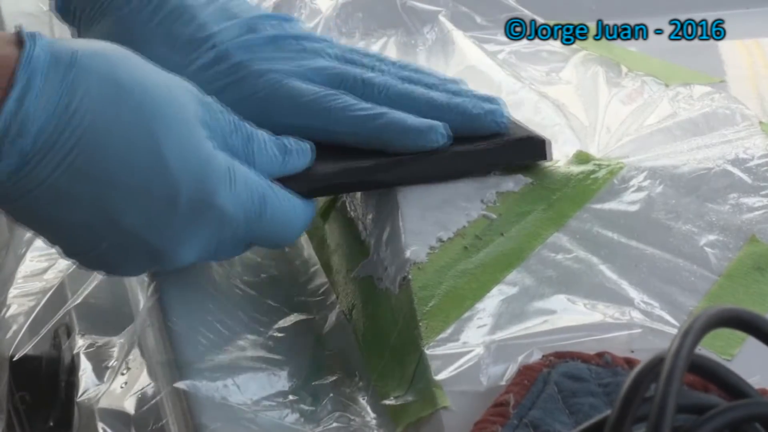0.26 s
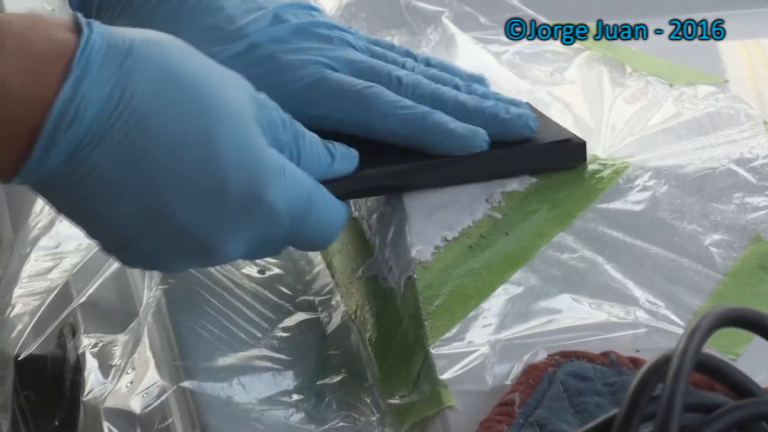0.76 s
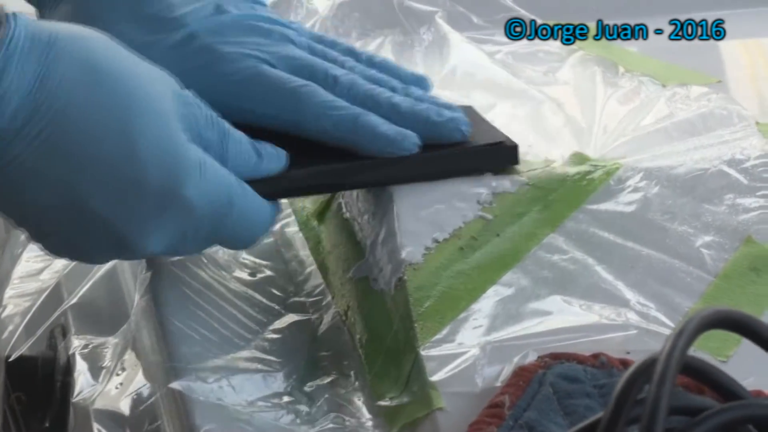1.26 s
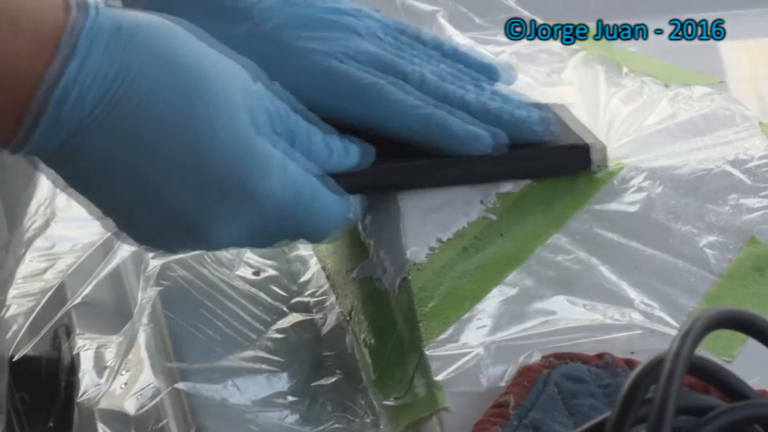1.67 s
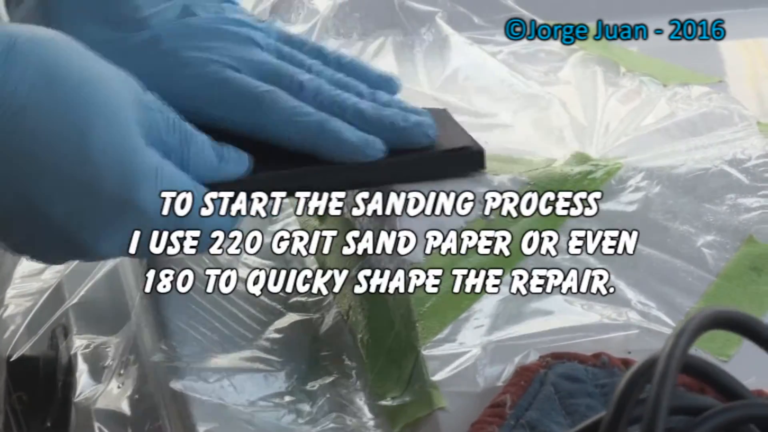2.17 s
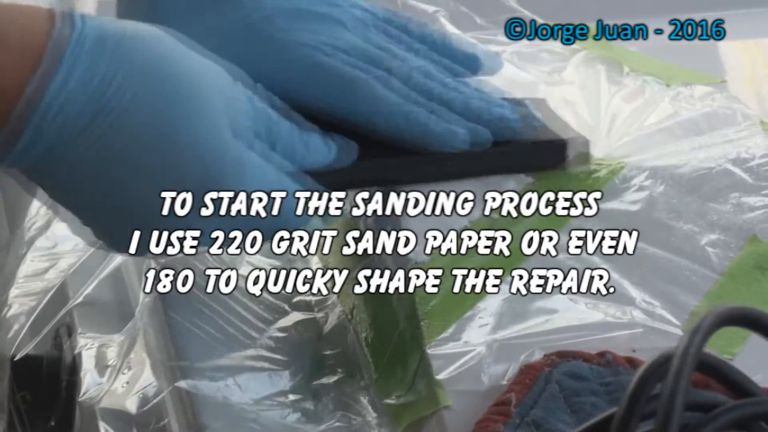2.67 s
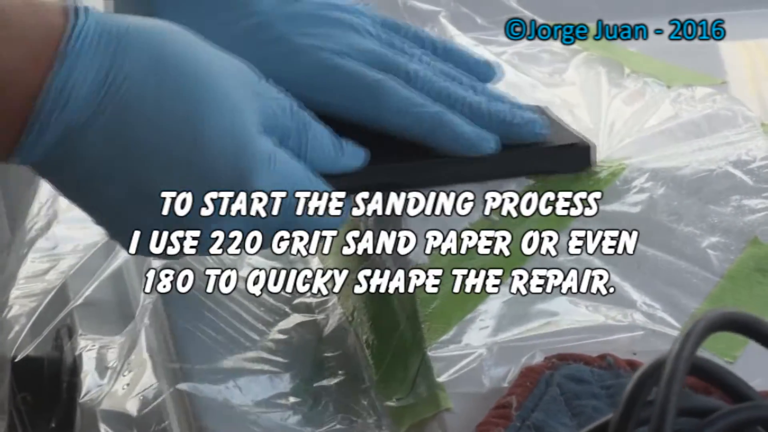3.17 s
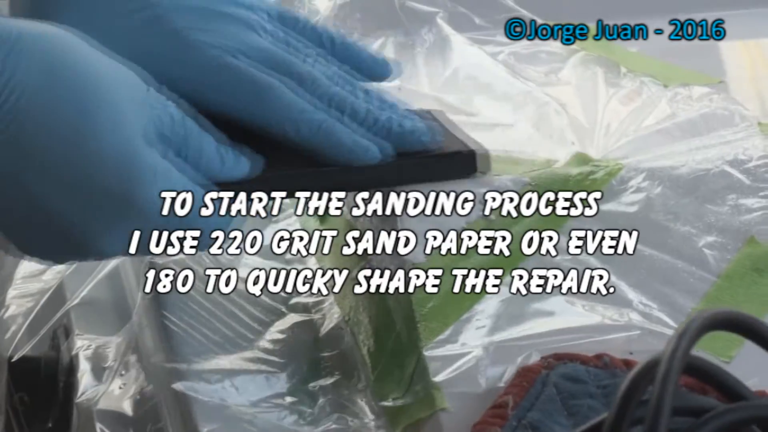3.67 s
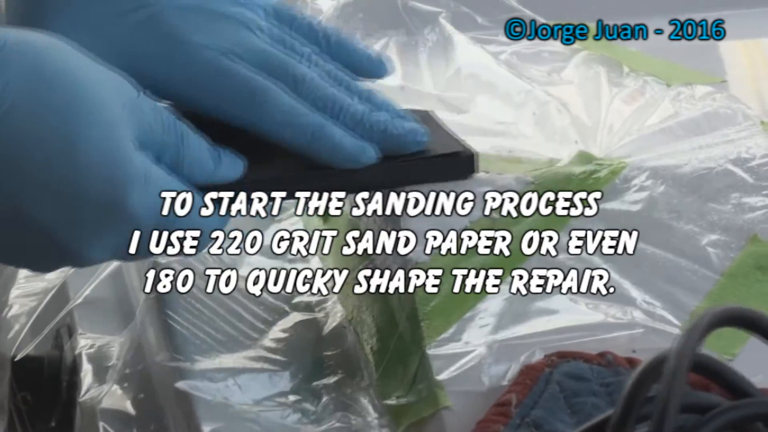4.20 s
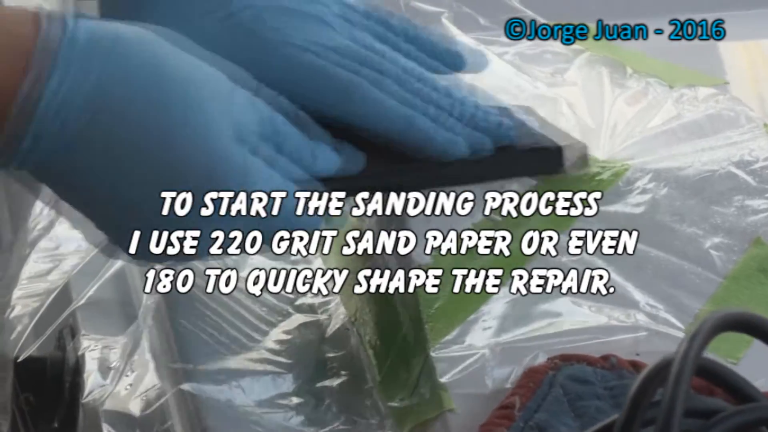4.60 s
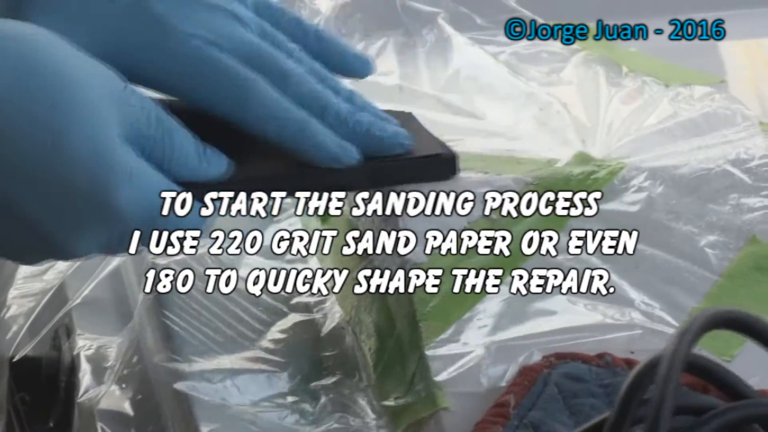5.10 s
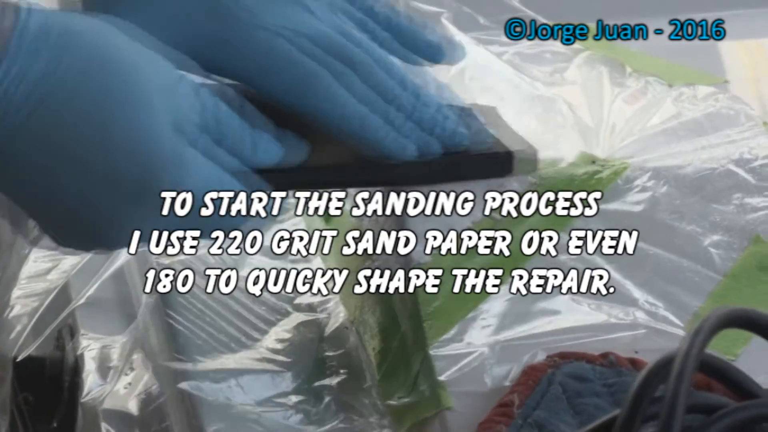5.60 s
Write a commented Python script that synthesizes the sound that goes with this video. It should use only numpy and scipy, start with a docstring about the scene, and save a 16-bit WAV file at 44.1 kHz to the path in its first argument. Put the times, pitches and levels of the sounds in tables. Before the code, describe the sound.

Fine sandpaper on a hand block rasps quickly to and fro over a hard hull, close up, while a vehicle passes nearby and fades into distant traffic.

```python
"""Beside a street, a hand block with fine sandpaper is pushed quickly to and fro over a coated fibreglass hull.
Close up, grit rasps in every stroke as bursts of tiny random fractures and rings the block's resonances.
Coarse grains snap now and then as struck resonances; a panel booms dully once.
At first a motor vehicle passes nearby, as filtered noise and sines tied to its crank rate;
then its drone sinks in pitch and fades into distant traffic."""
import sys
import numpy as np
from scipy import signal
from scipy.fft import rfft, irfft, next_fast_len
from scipy.io import wavfile

SR = 44100
rng = np.random.default_rng(int(sys.argv[2]) if len(sys.argv) > 2 else 0)


def store_pcm(level_fs):
    """Save levels as 16-bit WAV."""
    pcm = np.round(np.clip(level_fs, -1, 1) * 32767).astype(np.int16)
    wavfile.write(sys.argv[1], SR, np.atleast_2d(pcm).T)


N = 257984
TIME = np.arange(N) / SR
SIZE = next_fast_len(N + 4096)
FREQS = np.maximum(np.arange(SIZE // 2 + 1) * SR / SIZE, 1)

NEAREST_S = 0.45  # the vehicle is nearest
# lead of the left port for street sounds: frequency_hz, left_lead_rad
STREET_LEAD = [(40, 1), (130, 1), (500, 0.78), (1200, 0.44), (3000, .1)]


def from_db(db):
    """Decibels to gain."""
    return 10 ** (np.asarray(db) / 20)


def rms_one(x):
    """Scale to unit power."""
    return x / np.sqrt(np.mean(x ** 2) + 1e-20)


def in_time(rows):
    """One curve over time for each column after the first."""
    s, *columns = np.transpose(rows)
    return [np.interp(TIME, s, c) for c in columns]


def over_hz(points):
    """Join points on a log-frequency axis."""
    hz, value = np.transpose(points)
    return np.interp(np.log(FREQS), np.log(hz), value)


def filtered(x, response):
    """Pass a signal through a frequency response."""
    return irfft(rfft(x, SIZE) * response, SIZE)[..., :N]


def resonances(modes):
    """Response of damped modes in parallel."""
    response = 0
    for hz, width, db in modes:
        response = response + from_db(db) / (1 + 1j * (FREQS ** 2 - hz ** 2) / (FREQS * width))
    return response


def drift(rate_hz):
    """Slow random wander with spread 1, made at every 64th sample."""
    count = 4096
    hz = np.arange(count // 2 + 1) * SR / (64 * count)
    slow = irfft(rfft(rng.standard_normal(count)) / (1 + (hz / rate_hz) ** 2))
    return np.interp(np.arange(N) / 64, np.arange(count), rms_one(slow))


def ports(pair, colour, balance, likeness, phase):
    """Colour two unrelated signals and mix them into a partly alike left and right; rms 1."""
    alike = np.clip(over_hz(likeness), 0, .999)
    mid, side = rfft(pair, SIZE)
    sign = np.array([[1], [-1]])
    gains = from_db(sign * over_hz(balance) / 2)
    gains = gains / np.sqrt(np.mean(gains ** 2, axis=0))
    gains = gains * np.exp(.5j * sign * over_hz(phase))
    both = np.sqrt(1 + alike) * mid + sign * np.sqrt(1 - alike) * side
    return rms_one(irfft(both * gains * colour, SIZE)[:, :N])


def pass_by():
    """Relative dB as the vehicle goes by: distance alone, then the engine bay with load and shadow."""
    pass_s, falloff = 0.52, 1.307  # time scale of the pass; amplitude fades as this power of distance
    away_s, away_over_s, shadow_db = 1.21, 0.032, -9  # its front faces away, which shades the engine bay
    ease_s, ease_over_s, load_db = 0.24, .04, 7  # the engine eases off; until then it is rougher
    distance_db = -10 * falloff * np.log10(1 + ((TIME - NEAREST_S) / pass_s) ** 2)
    away = .5 + .5 * np.tanh((TIME - away_s) / away_over_s)
    load = .5 - .5 * np.tanh((TIME - ease_s) / ease_over_s)
    return distance_db, distance_db + shadow_db * away + load_db * load


def street_noise(spectrum, ring_db=0):
    """Steady noise from the street, coloured by narrow resonances of the surroundings."""
    # narrow bands that stand out: frequency_hz, width_hz, level_db
    street_modes = [(264, 14, -9), (500, 46, -3), (575, 17, -14), (700, 26, -3), (830, 92, 2),
                    (960, 123, -1), (1200, 38, -6.5)]
    # level of left over right: frequency_hz, left_right_db
    street_balance = [(30, -9), (70, -5), (130, -3), (500, -3.5), (1000, -4.5), (3000, -5.5), (12000, -5)]
    # how alike the two ports sound: frequency_hz, likeness (0-1)
    street_likeness = [(30, 0.4), (120, 0.59), (300, 1), (600, 1), (1200, 0.69), (3000, 0.38), (10000, 0.2)]
    ring = np.abs(1 + from_db(ring_db) * resonances(street_modes))
    colour = from_db(over_hz(spectrum)) * ring
    return ports(rng.standard_normal((2, SIZE)), colour, street_balance, street_likeness, STREET_LEAD)


def street(roar_db=-30.0, flutter_db=1.2, rumble_db=-36, rumble_fall_db_per_s=5, far_rumble_db=-53,
           traffic_db=-42.5):
    """Tyre roar and a quickly sinking rumble of the passing vehicle over far traffic."""
    # noise spectra of tyres and body, of the low rumble, and of far traffic: frequency_hz, density_db
    roar_spectrum = [(100, 1.5), (250, -2), (350, 0.5), (420, 2), (530, 3.5), (680, 1.5), (850, -2.5),
                     (1300, -5.5), (2000, -10.5), (3200, -21.5), (6000, -52), (15000, -60)]
    rumble_spectrum = [(20, -54), (50, -37), (80, -42), (130, 12), (200, 4), (300, 1.5), (500, -25),
                       (1500, -56)]
    traffic_spectrum = [(20, -21.5), (45, 4), (70, 2), (115, 0.5), (180, -2.5), (340, -8.5), (520, -9.5),
                        (900, -10.5), (1400, -8), (2500, -15.5), (6000, -19), (15000, -31)]
    distance_db, bay_db = pass_by()
    roar_gain = from_db(roar_db + distance_db + flutter_db * drift(1.7))
    near_rumble = from_db(rumble_db + bay_db - rumble_fall_db_per_s * TIME)
    rumble_gain = np.hypot(near_rumble, from_db(far_rumble_db))
    roar = roar_gain * street_noise(roar_spectrum)
    rumble = rumble_gain * street_noise(rumble_spectrum)
    traffic = from_db(traffic_db) * street_noise(traffic_spectrum)
    return roar + rumble + traffic


def engine(note_db=4.0, uneven_db=-31, whine_db=-42, waver_db=2.5, wander_rad=0.44, far_waver_db=3.0,
           far_wander_rad=0.74, far_loss_db=-3, whine_wander_rad=0.61, level_db=-3.0, pan_db=-3.2):
    """Orders of the crank rate: exhaust note, firing hum, wavering lines between and a whine; a throb below."""
    # engine speed: time_s, crank_turns_per_s
    crank_rate = [(0, 16.8), (1.2, 16.6), (2.3, 16.2), (3.6, 15.95), (5.85, 15.2)]
    # exhaust note, eight times the crank rate: time_s, relative_db
    note = [(0.0, -22.5), (0.16, -22), (0.31, -34), (0.45, -37), (0.5, -20), (0.55, -26), (0.63, -19),
            (1.12, -29), (1.29, -51), (1.38, -41), (1.79, -36), (2.38, -54), (2.54, -44), (3.36, -43.5),
            (4.32, -55.5), (4.43, -41.5), (4.56, -47), (5.85, -39.5)]
    # firing hum, six times the crank rate: time_s, relative_db
    hum = [(0, -36), (1.2, -53), (1.5, -41), (2.3, -37.5), (2.5, -45), (5.85, -56.5)]
    # lines of the uneven firing: crank_multiple, relative_db
    uneven_lines = [(4, -19), (5, -2), (7.5, -11), (10, -18), (11, -3), (13, -7.5), (14, -11.5), (15, -13),
                    (16, -8.5), (19, -11.5), (22, -13)]
    # very deep throb: time_s, pitch_hz, relative_db
    throb = [(0.9, 38, -64), (2, 34, -47), (2.9, 29.3, -44), (3.3, 27.3, -50), (3.7, 26, -70)]
    crank = 2 * np.pi * np.cumsum(in_time(crank_rate)[0]) / SR
    _, bay_db = pass_by()
    far = TIME / TIME[-1]  # the farther the vehicle, the more its tones fade in and out on the way
    tone = np.zeros(N)

    exhaust_db = note_db + in_time(note)[0] + far * far_loss_db
    for order, db in ((8, exhaust_db), (6, in_time(hum)[0])):
        gain = from_db(db + far * far_waver_db * drift(9))
        tone += gain * np.sin(order * crank + far * far_wander_rad * drift(12))

    for order, db in uneven_lines:
        phase = order * crank + rng.uniform(0, 2 * np.pi) + wander_rad * drift(17.0)
        tone += from_db(uneven_db + bay_db + db + waver_db * drift(6.8)) * np.sin(phase)

    # the whine beams sideways and flares as the vehicle is nearest
    beam_db, beam_s = 9, 0.23
    flare_db = beam_db * np.exp(-((TIME - NEAREST_S) / beam_s) ** 2)
    whine_phase = 29 * crank + whine_wander_rad * drift(4.6)
    tone += from_db(whine_db + bay_db + flare_db) * np.sin(whine_phase)

    throb_hz, throb_db = in_time(throb)
    tone += from_db(throb_db) * np.sin(2 * np.pi * np.cumsum(throb_hz) / SR)

    half = np.array([[.5], [-.5]])  # left and right share the difference
    direction = from_db(half * pan_db) * np.exp(1j * half * over_hz(STREET_LEAD))
    return np.sqrt(2) * from_db(level_db) * filtered(tone, direction)


def arm_motion(rasp_power, creep):
    """The block speeds up and stops in each stroke; gives speed and the strengths of hiss, rasp and fizz."""
    # strokes, push and pull in turn: top_speed_s, relative_db, bite_db (lower rasp against the stroke)
    strokes = [(0.095, -48, -1), (0.29, -54, -5), (0.446, -35, -1.5), (0.687, -32.5, -8.5),
               (0.84, -34.5, -2.5), (0.985, -38, -5.5), (1.166, -32.5, -2), (1.314, -31, -6.5),
               (1.474, -32.5, -2), (1.638, -29.5, -9.5), (1.78, -29.5, -4.5), (1.927, -29, -6),
               (2.09, -30.5, -4), (2.236, -30, -7), (2.397, -27, -5.5), (2.525, -27.5, -9),
               (2.687, -27.5, -8), (2.826, -31, -8), (2.98, -30.5, -2), (3.114, -33, -6.5),
               (3.262, -30, -6), (3.413, -28.5, -5.5), (3.566, -27.5, -6), (3.71, -29, -8),
               (3.85, -30, -5.5), (4.008, -31, -6), (4.137, -28, -4.5), (4.289, -31.5, -7),
               (4.44, -27.5, -5), (4.573, -29, -7.5), (4.722, -28.5, -5.5), (4.878, -31, -6),
               (5.032, -28, -5.5), (5.167, -27.5, -7.5), (5.311, -27, -7), (5.461, -28.5, -5.5),
               (5.603, -28.5, -4.5), (5.747, -29.5, -7), (5.895, -27.5, -4)]
    # top fizz against the hiss: time_s, relative_db
    fizz_curve = [(0, -2.5), (2.3, 0), (3.3, -2), (4.5, -1), (5.05, -0.5), (5.6, -6), (5.85, -3)]
    # the block turns this far between two top speeds, or rests if they lie far apart
    turn_share, longest_half_s = 0.43, 0.073
    push_steep, pull_steep = 1.09, 0.96  # how steeply the sound swells with speed
    hesitant_steep, settled_s = 0.33, 1.3  # added at first, until the rhythm has settled
    speed, hiss, rasp, fizz = np.zeros((4, N))
    gaps = np.diff([row[0] for row in strokes])
    run_ups = np.minimum((1 - turn_share) * np.r_[np.inf, gaps], longest_half_s)
    run_outs = np.minimum(turn_share * np.r_[gaps, np.inf], longest_half_s)
    for k, (s, level_db, bite_db) in enumerate(strokes):
        steep = pull_steep if k % 2 else push_steep
        steep += hesitant_steep * max(1 - (s / settled_s) ** 2, 0)
        travel = np.interp(TIME, [s - run_ups[k], s, s + run_outs[k]], [0, .5, 1])
        swell = np.abs(np.sin(np.pi * travel)) ** steep
        speed += swell
        hiss += from_db(level_db) * swell
        rasp += from_db(level_db + bite_db) * swell ** rasp_power
        fizz += from_db(level_db) * swell ** 1.01  # the top needs speed
    fizz *= from_db(in_time(fizz_curve)[0])
    # once the rhythm is under way the paper never quite rests at a turn
    under_way = np.interp(TIME, [1.05, 1.6], [.15, 1])
    resting = creep * from_db(in_time(strokes)[0]) * under_way
    # the top fizz and the rasp die down further than the hiss
    return speed, np.hypot(hiss, resting), np.hypot(rasp, resting / 2), np.hypot(fizz, 0.66 * resting)


def grit(speed, per_s, spread_db):
    """Tiny fractures of uneven size, more of them at speed; even in power."""
    chance = np.clip(per_s * (speed + .25) / SR, .001, 1)
    sizes = from_db(spread_db * np.minimum(rng.exponential(1, (2, N)), 5))
    breaks = rng.random((2, N)) < chance
    return breaks * sizes * rng.standard_normal((2, N)) / np.sqrt(chance)


def at_block(pair, colour):
    """A sound from the sanding block as the two microphone ports hear it."""
    # level of left over right: frequency_hz, left_right_db
    block_balance = [(400, -28), (1400, -9), (2400, -4.5), (3600, -6), (4800, -7.5), (7000, -7), (8500, -3),
                     (9600, -1.5), (11100, 3), (11700, -10), (13400, -14), (14200, -18)]
    # how alike the two ports sound: frequency_hz, likeness (0-1)
    block_likeness = [(400, 0.47), (2000, 0.87), (6000, 0.76), (10500, 0.76), (13400, 0.93), (15000, .15)]
    # lead of the left port: frequency_hz, left_lead_rad
    block_lead = [(1000, -0.22), (2000, -0.26), (3800, 0.64), (5700, 0.057), (7400, -0.98), (11100, 0.012),
                  (11800, 0.11)]
    return ports(pair, colour, block_balance, block_likeness, block_lead)


def sanding(hiss_db=-5.5, fizz_db=-6.5, rasp_db=-4.5, ring_db=-8.0, creep=0.2, judder_db=0.56,
            rasp_judder_db=1.0, rasp_power=0.66, split_hz=7500):
    """Grit hisses with speed; a stroke that bites harder also rasps lower and rings the block."""
    # fine hiss and lower rasp of the grit: frequency_hz, density_db
    hiss_spectrum = [(300, -16), (1200, -7), (2200, -11), (3300, -4), (4600, -1), (6500, -0.5),
                     (8000, -0.5), (10500, 1), (11500, 0), (12700, -3.5), (14000, -8), (15800, -14.5)]
    rasp_spectrum = [(150, -3), (250, -3.5), (350, -21), (490, -1.5), (700, -6.5), (1200, -12.5), (1700, 1),
                     (2100, -3.5), (2700, 1.5), (3600, -1), (5000, -11), (9000, -14)]
    # resonances of block and hull: frequency_hz, width_hz, level_db
    block_modes = [(1747, 160, -3.5), (1938, 60, 1.5), (2240, 70, -0.5), (2443, 53, 1), (2515, 160, 1.5),
                   (2877, 160, -7), (3050, 43, -3.5), (3770, 200, -4), (5510, 130, -12), (6930, 133.5, -4)]
    speed, hiss_gain, rasp_gain, fizz_gain = arm_motion(rasp_power, creep)
    low_share = 1 / (1 + (FREQS / split_hz) ** 6)  # power share of hiss below the fizz
    colour = from_db(over_hz(hiss_spectrum))
    hiss_grit = grit(speed, per_s=22000, spread_db=2.0)
    fizz_grit = grit(speed, per_s=20000, spread_db=2.0)
    rasp_grit = grit(speed, per_s=16000, spread_db=1.5)
    ring_grit = grit(speed, per_s=10000, spread_db=1.2)
    hiss = from_db(hiss_db) * at_block(hiss_grit, colour * np.sqrt(low_share))
    fizz = from_db(fizz_db) * at_block(fizz_grit, colour * np.sqrt(1 - low_share))
    rasp = from_db(rasp_db) * at_block(rasp_grit, from_db(over_hz(rasp_spectrum)))
    ring = from_db(ring_db) * at_block(ring_grit, resonances(block_modes))
    # the grip of the paper wavers along the way
    grip = from_db(judder_db * drift(42))
    rasp_grip = from_db(rasp_judder_db * drift(30))
    return grip * (hiss_gain * hiss + fizz_gain * fizz + rasp_gain * (rasp + ring) * rasp_grip)


def snaps(pan_db=-2.5, crumble=0.024, crumble_s=0.011):
    """A coarse grain breaks with one click and crumbles for a few milliseconds, exciting damped modes."""
    # coarse grains that catch and snap: start_s, relative_db, top_edge_hz
    snap_list = [(0.041, -34, 7000), (0.2015, -30, 12000), (0.207, -37, 10000), (0.311, -33, 12500),
                 (0.318, -31, 12500), (0.393, -26, 13000), (0.693, -15.5, 14000), (1.557, -13, 11000),
                 (1.564, -17, 8000), (1.759, -19.5, 3500), (1.802, -16.5, 12500), (1.905, -17, 12500),
                 (2.9515, -19, 9000), (4.273, -17.5, 12500)]
    # what a snap rings with: frequency_hz, width_hz, level_db
    snap_modes = [(2390, 570, -2), (5130, 1100, -1.5), (6660, 980, -3.5), (10400, 3200, -6)]
    out = np.zeros(N)
    age = TIME[:SR // 20]
    impulse = irfft(resonances(snap_modes))[:len(age)]
    for s, level_db, edge_hz in snap_list:
        burst = (age == 0) + crumble * rng.standard_normal(len(age)) * np.exp(-age / crumble_s)
        lowpass = signal.butter(4, edge_hz, fs=SR, output="sos")
        ring = signal.sosfilt(lowpass, impulse)
        snap = signal.fftconvolve(burst, ring / np.abs(ring).max())[:len(age)]
        at = round(s * SR)
        out[at:at + len(age)] += from_db(level_db) * snap
    return out * from_db([[pan_db], [-pan_db]])


def hull_echoes(x, wet_db, t60_s):
    """Hull, hands and nearby walls scatter a short, dense tail."""
    tail = rng.standard_normal((2, N)) * from_db(-60 * TIME / t60_s) * (TIME > .001)
    tail /= np.linalg.norm(tail, axis=1)[:, None]
    return x + from_db(wet_db) * filtered(x, rfft(tail, SIZE))


def bumps(rise_s=0.016):
    """A soft push of the hand makes a hull panel boom briefly: a sine that swells and dies away."""
    # dull bump of the hand on the hull: start_s, pitch_hz, envelope_peak_db
    bump_list = [(2.29, 235, -39)]
    out = np.zeros(N)
    for s, hz, peak_db in bump_list:
        age = np.maximum(TIME - s, 0)
        envelope = age / rise_s * np.exp(1 - age / rise_s)
        out += from_db(peak_db) * envelope * np.sin(2 * np.pi * hz * age)
    return out


def scene():
    """Sanding in front, the street behind."""
    close = hull_echoes(sanding() + snaps(), wet_db=-5.5, t60_s=0.061)
    return street() + engine() + close + bumps()


def record(dry):
    """Between 1.0 and 1.3 s the bass moves from left to right; the top is cut steeply."""
    # slide of the bass to the right: time_s, share (held at 1 at most)
    bass_slide = [(1.0, 0), (1.25, 0.5), (1.5, 3)]
    # what stays on the left after the slide: frequency_hz, gain_db
    bass_left = [(30, -10), (90, -12), (140, -11.5), (260, -7.5), (600, -2), (1400, 0), (3000, 0.5)]
    share = np.clip(in_time(bass_slide)[0], 0, 1)
    moved = share * filtered(dry[0], 1 - from_db(over_hz(bass_left)))
    wide = np.array([dry[0] - moved, dry[1] + moved])
    cutoff_hz = 15900
    return signal.sosfilt(signal.ellip(10, .1, 80, cutoff_hz, fs=SR, output="sos"), wide)


dry = scene()
out = record(dry)
store_pcm(out)
```